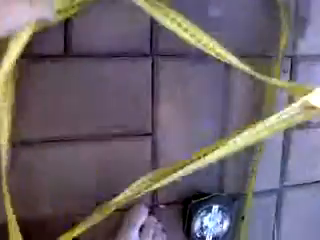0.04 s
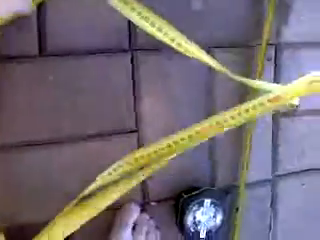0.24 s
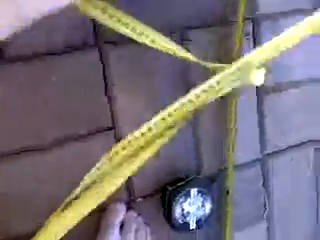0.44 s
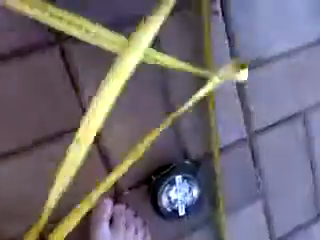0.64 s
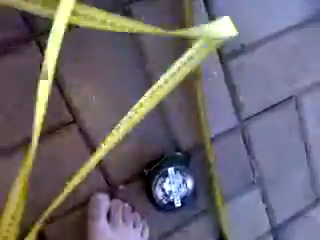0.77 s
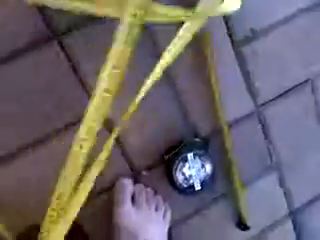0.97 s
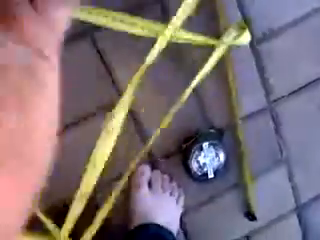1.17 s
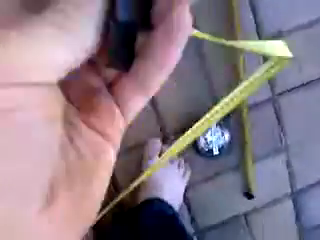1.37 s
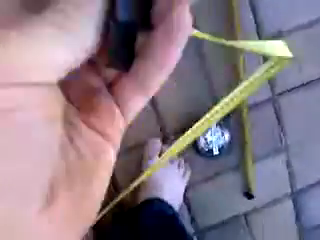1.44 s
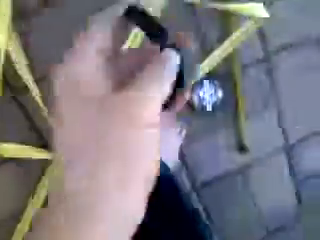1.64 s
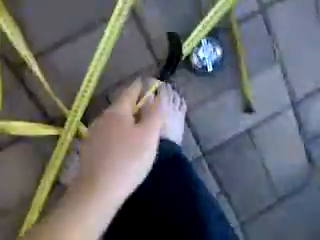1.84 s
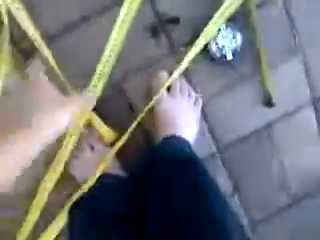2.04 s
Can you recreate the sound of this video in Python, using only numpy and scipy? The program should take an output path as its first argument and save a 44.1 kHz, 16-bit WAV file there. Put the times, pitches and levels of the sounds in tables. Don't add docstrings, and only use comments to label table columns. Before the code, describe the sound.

A loose steel tape blade is crumpled by hand, very close, outdoors. Faint hiss and low wind rumble lead until 0.2 s, when a harsh crinkling burst breaks out. Snaps and rattles return around 0.55-0.75 s; a sharp click lands near 0.86 s amid loud cracks. Dense metallic rustling fills 1.05-1.25 s, more snaps ring at 1.4 and 1.6 s, then it thins after 1.8 s. Peaks distort slightly.

```python
import sys
import numpy as np
from scipy import signal
from scipy.fft import rfft, irfft, next_fast_len
from scipy.io import wavfile
from scipy.ndimage import map_coordinates

SR = 44100
rng = np.random.default_rng(int(sys.argv[2]) if len(sys.argv) > 2 else 0)


def unload_wav(signal):
    wavfile.write(
        sys.argv[1],
        SR,
        np.round(np.clip(np.atleast_2d(signal).T, -1, 1) * 32767).astype(np.int16),
    )


def volts_from_db(level):
    exponent = np.asarray(level, float) / 20
    return 10 ** exponent


N = 92610

# t [s], level [dB]
WIND_STRENGTH = [(0.0, -45), (0.12, -45), (0.76, -41), (0.84, -45), (1.19, -47.5), (1.58, -46),
                 (1.82, -52.5), (2.1, -46)]
# f [Hz], level [dB]
RUMBLE_SPECTRUM = [(15, -39), (30, -3.5), (62, -3), (110, -3), (200, -30.5), (400, -60.5)]
# t [s], peak level [dB], f [Hz], t60 [s]
GUST_THUMPS = [
    (.035, -31, 61.4, 1),
    (.46, -34.5, 54, 0.44),
    (1.43, -29, 41.4, 0.59),
    (1.508, -19, 60, 0.099),
]
# f [Hz], level [dB]
YARD_SPECTRUM = [(60, -32), (120, -6), (250, -4), (500, -9), (1500, -10.5), (3000, -17.5), (7300, -26)]
# t [s], level [dB]
TRAFFIC_SWELL = [(0, -47), (.18, -45.5), (.33, -39), (.7, -42), (1.05, -42), (1.5, -48), (1.85, -43.5),
                 (2.1, -45.5)]
# f [Hz], level [dB]
BLADE_SPECTRUM = [(200, -33), (760, -20), (1600, -7.5), (2350, 0), (3300, -6.5), (4500, -3), (6200, -1.5),
                  (7400, -6)]
# t [s], peak level [dB], f [Hz], t60 [s]
SPAN_PINGS = [(.110, -40.5, 2790, 0.15), (.252, -12, 5000, 0.086), (.260, -15.5, 2700, .08),
              (.582, -17, 2500, 0.055), (.7045, -2, 6000, .012), (.7345, -4, 2650, 0.023),
              (.736, -22.5, 1200, 0.072), (.737, -16, 5400, 0.073), (.8685, -4, 2000, 0.01),
              (1.06, -25.5, 1050, 0.23), (1.11, -13, 2380, 0.27), (1.13, -22, 1145, 0.21),
              (1.155, -14.5, 2250, 0.077), (1.405, -18, 4370, 0.11), (1.408, -20.5, 4550, .15),
              (1.525, -23, 2330, 0.11), (1.598, -8.5, 6060, 0.043), (1.625, -10, 5040, 0.07),
              (1.675, -21, 2170, 0.16), (1.775, -20.5, 2400, 0.09), (1.81, -28, 2210, .3)]
# t [s], peak level [dB], spectral tilt [dB per octave], t60 [s]
FOLD_SNAPS = [(.005, -34.5, 2, .3), (0.1098, -35.5, -4, 0.17), (0.2033, -21.5, -0.8, 0.44),
              (.2185, -16, -5.5, 0.55), (0.2447, -7, 4.8, 0.077), (0.5408, -16, 1.5, 0.6),
              (0.5796, -11, 2.5, 0.14), (0.659, -13, 0.7, 0.11), (0.705, -10, 1, 0.2),
              (0.7343, -6, 2.1, 0.23), (.8036, -14, .3, 0.1), (0.8543, -3, -0.1, 0.22),
              (.8615, -10.5, 1, .25), (.8680, -14, 7, 0.075), (0.9052, -8, 1, .15), (1.039, -8.5, 7.5, .2),
              (1.2053, -8, 3.5, 0.5), (1.2647, -10, 0.8, 0.11), (1.3448, -20, 2, .2),
              (1.3984, -12.5, 2, 0.89), (1.478, -19, 1, 0.29), (1.5903, -9, 4, 0.35),
              (1.5968, -9, -0.3, 0.51), (1.7538, -13.5, 1.5, 0.6), (1.926, -26.5, -6, 0.09),
              (1.968, -23, 1.5, 0.2), (1.996, -30, -2, .3), (2.024, -34, -5.5, 0.56)]
# t [s], level [dB]
HAND_EFFORT = [(.07, -48.5), (.19, -42), (.255, -9), (.33, -24), (.46, -16.5), (.53, -29), (.6, -23.5),
               (.84, -28.5), (.9, -16.5), (1.01, -25), (1.05, -12), (1.16, -11.5), (1.39, -22.5),
               (1.565, -31.5), (1.61, -16), (1.78, -24.5), (1.94, -35.5), (2.1, -48)]

KINK_T60_S, KINK_SPREAD_DB, KINK_DB = 0.066, 2, -2.5
SCRAPE_DB, FLUTTER_DB = 0.5, 0.95
SNAP_DB, CRACK_DB, SHIVER_DB = -17, -3.5, -8.5
CLICK_S, CLICK_DB, CLICK_HOLD_S = 0.8575, -3.5, 0.003
BAND_TOP_HZ, BAND_EDGE_HZ = 7270, 100
CLIP_LEVEL, CLIP_KNEE, SPILL_TOP_HZ = 0.88, 24, 10300


def unit(x):
    return x / np.sqrt(np.mean(x ** 2) + 1e-20)


def along(points, hz):
    f, level = np.transpose(points)
    return np.interp(np.log(hz + 1), np.log(f + 1), level)


def curve(rows):
    return np.interp(np.arange(N) / SR, *np.transpose(rows))


def wobble(rate):
    knots = rng.standard_normal(int(N * rate / SR) + 4)
    return map_coordinates(knots, [np.arange(N) * rate / SR])


def filtered(x, response):
    m = next_fast_len(N + 8192)
    return irfft(rfft(x, m) * response(np.fft.rfftfreq(m, 1 / SR)), m)[..., :N]


def hiss(spectrum):
    return unit(filtered(rng.standard_normal(N), lambda hz: volts_from_db(along(spectrum, hz))))


def rings(start, hz, gain, t60, size):
    k = np.arange(size)
    t = k / SR
    decay = volts_from_db(-60 * t / t60[:, None]) * (1 - k / size)
    rows = gain[:, None] * np.sin(2 * np.pi * hz[:, None] * t) * decay
    place = (start * SR).astype(int)[:, None] + k
    return np.bincount(place.ravel(), rows.ravel(), N + SR)[:N]


def struck(rows, attack_s, size):
    out, t = np.zeros(N + size), np.arange(size) / SR
    onset = (1 - np.exp(-t / attack_s)) * (1 - t / t[-1])
    for s, db, hz, t60 in rows:
        i = round(s * SR)
        out[i:i + size] += volts_from_db(db - 60 * t / t60) * onset * np.sin(2 * np.pi * hz * t)
    return out[:N]


def yard():
    return volts_from_db(curve(TRAFFIC_SWELL) + 1.4 * wobble(6.8)) * hiss(YARD_SPECTRUM)


def wind():
    rumble = volts_from_db(curve(WIND_STRENGTH) + 2.3 * wobble(9)) * hiss(RUMBLE_SPECTRUM)
    return rumble + struck(GUST_THUMPS, 0.0071, size=12000)


def click():
    t = np.arange(N) / SR - CLICK_S
    damping = volts_from_db(-60 * np.clip(t - CLICK_HOLD_S, 0, 1) / 0.012)
    hold = np.clip(t / 0.0006, 0, 1) * damping
    modes = np.sin(2 * np.pi * 6200 * t) + 0.3 * np.sin(2 * np.pi * 5420 * t)
    return volts_from_db(CLICK_DB) * hold * modes


def pings():
    return struck(SPAN_PINGS, 0.00091, size=6000)


def shiver_noise(tilt_db, grain):
    spectrum = [(hz, db + tilt_db * np.log2(hz / 3500)) for hz, db in BLADE_SPECTRUM]
    return np.pad(hiss(spectrum) * grain, (0, SR))


def snaps(count=30):
    out, t = np.zeros(N + SR), np.arange(SR // 8) / SR
    grain = volts_from_db(1.3 * wobble(150))
    dull, bright = shiver_noise(-4, grain), shiver_noise(4, grain)
    onset = (1 - np.exp(-t / 0.0012)) * (1 - t / t[-1])
    for s, db, tilt_db, t60 in FOLD_SNAPS:
        pitch, lag, size = rng.random((count, 3)).T
        hz = 600 + 6800 * pitch
        level = SNAP_DB + along(BLADE_SPECTRUM, hz) + 8 * (size - 0.5) + tilt_db * np.log2(hz / 3500)
        modes = volts_from_db(level)[:, None] * np.sin(2 * np.pi * (hz[:, None] * t + lag[:, None]))
        ringing = modes.sum(0) * volts_from_db(-60 * t / (0.8 * t60))
        i = round(s * SR)
        span = slice(i, i + len(t))
        turn = np.pi / 4 * (1 + np.clip(tilt_db / 4, -1, 1))
        shiver = np.cos(turn) * dull[span] + np.sin(turn) * bright[span]
        decay = volts_from_db(SHIVER_DB - 60 * t / t60) + volts_from_db(CRACK_DB - 60 * t / 0.012)
        out[span] += volts_from_db(db) * onset * (ringing + decay * shiver)
    return out[:N]


def crinkle(count=4000):
    effort = volts_from_db(curve(HAND_EFFORT) + FLUTTER_DB * (wobble(25) + wobble(90)))
    when, pitch, size, life = rng.random((count, 4)).T
    s, hz = when * (N - 1) / SR, 300 + 7100 * pitch
    gain = volts_from_db(along(BLADE_SPECTRUM, hz) - KINK_SPREAD_DB * np.log(size + 0.0018))
    t60 = KINK_T60_S * (0.37 + 1.1 * life)
    scale = np.sqrt(np.sum(gain ** 2 * t60) * SR / N / (4 * np.log(1000)))
    kinks = rings(s, hz, gain * effort[(s * SR).astype(int)] / scale, t60, size=600)
    scrape = effort * hiss(BLADE_SPECTRUM)
    return volts_from_db(KINK_DB) * kinks + volts_from_db(SCRAPE_DB) * scrape


def scene():
    mono = yard() + wind() + click() + pings() + snaps() + crinkle()
    return np.tile(mono, (2, 1))


def band_limit(x):
    return signal.sosfilt(signal.butter(12, 12500, fs=SR, output="sos"), x)


def record(dry):
    slope_hz = BAND_EDGE_HZ / 2
    x = filtered(dry, lambda hz: 1 / (1 + np.exp(np.clip((hz - BAND_TOP_HZ) / slope_hz, -50, 50))))
    x = x / (1 + np.abs(x / CLIP_LEVEL) ** CLIP_KNEE) ** (1 / CLIP_KNEE)
    x = filtered(x, lambda hz: 1 / (1 + (hz / SPILL_TOP_HZ) ** 60))
    return band_limit(x)


dry = scene()
out = record(dry)
unload_wav(out)
```